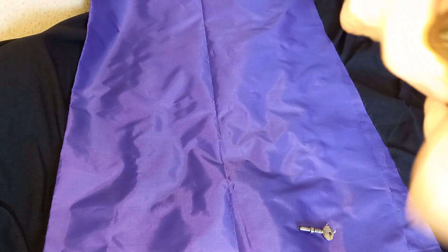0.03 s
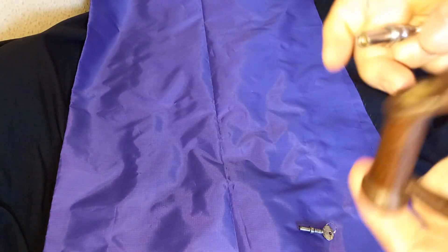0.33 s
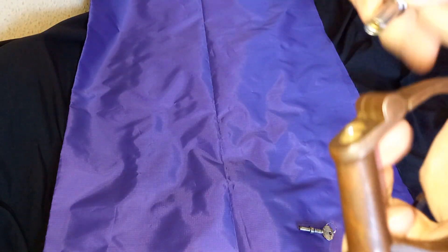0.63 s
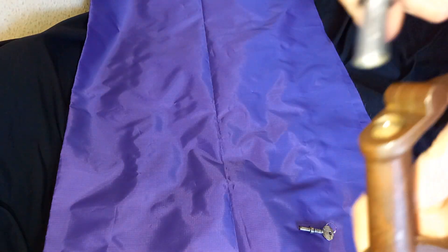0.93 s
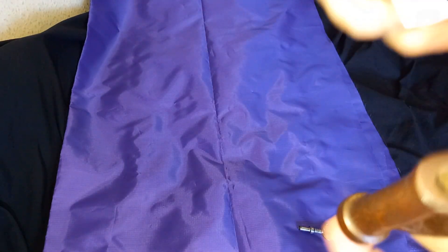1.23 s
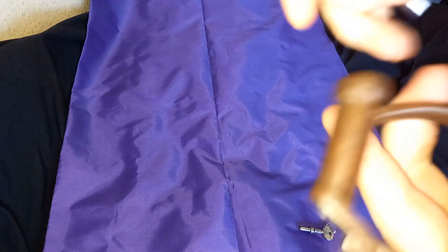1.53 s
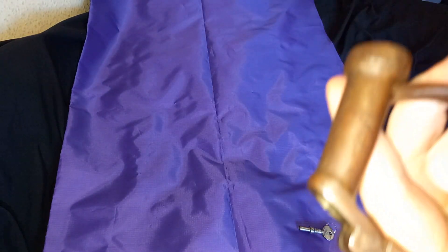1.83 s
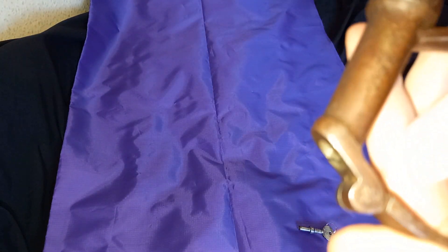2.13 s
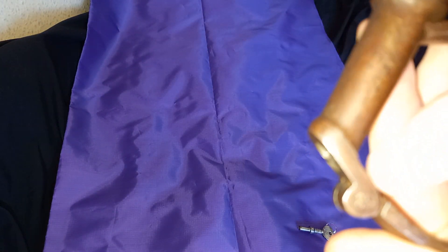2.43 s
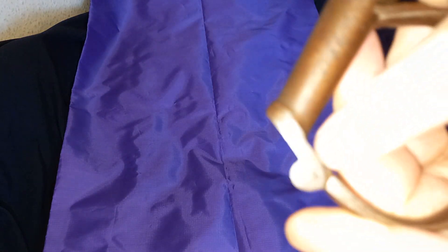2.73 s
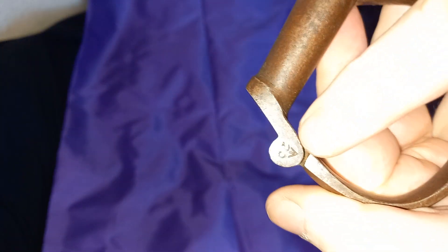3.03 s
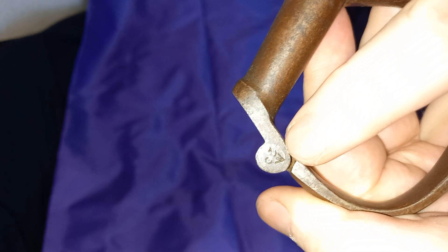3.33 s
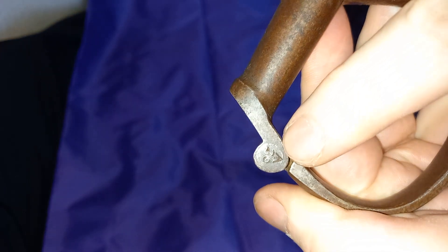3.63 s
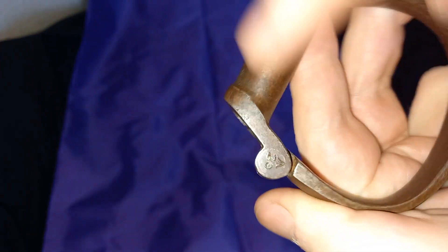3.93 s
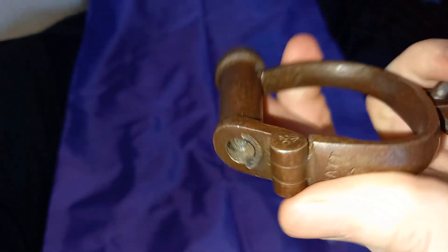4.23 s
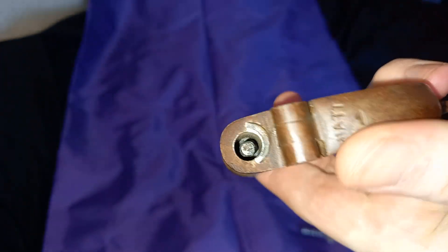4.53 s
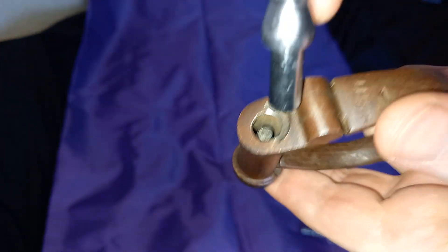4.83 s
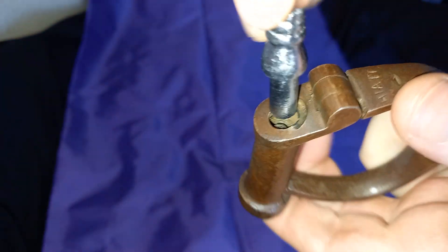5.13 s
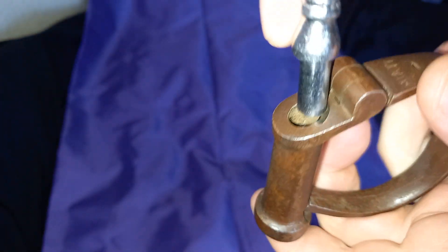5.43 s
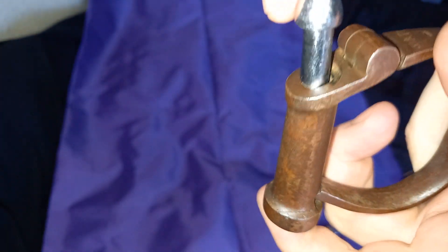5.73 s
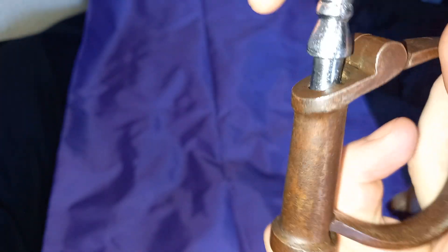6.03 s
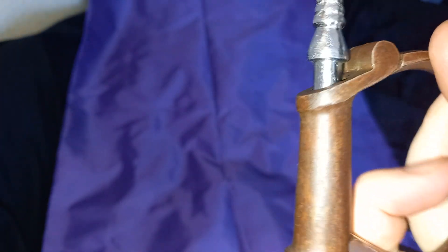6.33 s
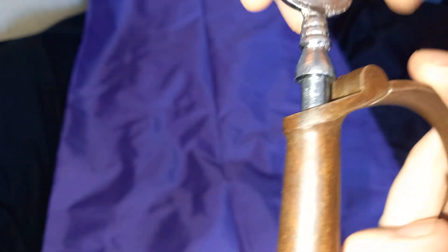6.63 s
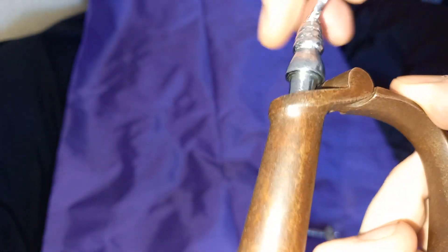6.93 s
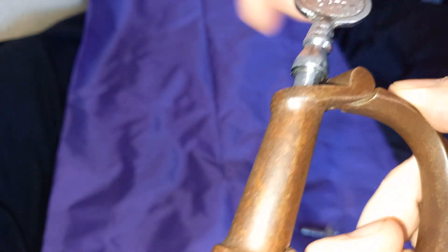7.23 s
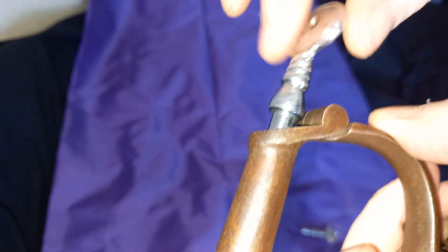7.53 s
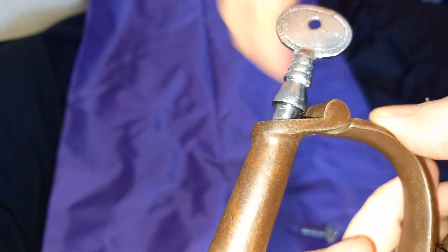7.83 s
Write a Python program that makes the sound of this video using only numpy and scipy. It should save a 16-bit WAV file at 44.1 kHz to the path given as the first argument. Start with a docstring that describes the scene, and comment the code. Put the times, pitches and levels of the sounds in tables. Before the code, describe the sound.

In a small room with a faint hum and hiss, someone handles metal handcuffs right by the microphone. Short, ringing clinks and light scrapes come first, slightly to the right, mixed with dull hand bumps. Things go almost still, then the clinking returns. A little to the left, a key clicks against the keyhole, rattles sharply into the lock and turns with small ticks and thin squeaks.

```python
"""Old steel handcuffs are turned in the hands, close to a stereo microphone in a small, quiet room.
A low hum lies under it all. First hands bump softly, skin slides on metal and the links clink.
Near 2 s the bow (the swinging arm) knocks on its hinge; a fingertip rubs it, and both parts sound again.
From 5 s a barrel key taps the keyhole, drops into the lock near 6 s and is screwed in with faint squeaks.
Each knock is a sharp crack and a few ringing tones; each slide or squeak is a stream of tiny catches."""
import sys
import numpy as np
from scipy import signal
from scipy.fft import rfft, irfft, next_fast_len
from scipy.io import wavfile

SR = 44100
rng = np.random.default_rng(int(sys.argv[2]) if len(sys.argv) > 2 else 0)


def transcribe(signal):
    """Save signal, clipped to [-1, 1], as a 16-bit WAV file at the path in sys.argv[1]."""
    frames = np.atleast_2d(signal).T
    limited = np.clip(frames, -1, 1)
    pcm = np.round(limited * 32767).astype(np.int16)
    wavfile.write(sys.argv[1], SR, pcm)


N = 357210
TIME = np.arange(N) / SR

# Still air and microphone hiss. Each row: pitch in Hz, relative level in dB.
AIR_COLOUR = [(40, -27.5), (65, -5), (140, -5.5), (225, -5), (450, -10.5), (900, -19.5), (1470, -19),
              (4000, -33.5), (6000, -33.5), (8000, -42.5), (10700, -44), (14000, -48), (14900, -22.5),
              (15800, -28)]
# The low background murmur, which dips early and slowly swells again.
# Each row: time in seconds, level in dB.
MURMUR_LEVELS = [(0.0, -60.5), (0.4, -71), (4.4, -65), (8.1, -66)]
# The low hum. Each row: pitch in Hz, level in dB.
HUM_TONES = [(173, -72), (227, -75)]
# Hands and sleeves. Each row: middle in seconds, rough length in seconds, pitch in Hz, relative level in dB.
HAND_BUMPS = [(.1, 0.96, 58.8, -55.5), (.58, 0.25, 62, -57), (1.079, 0.34, 70, -55),
              (1.55, 0.31, 121, -54.5), (1.76, 0.17, 129, -58.5), (2.44, 0.15, 131, -56),
              (3.38, 0.18, 270, -62), (4.27, 0.087, 135, -54), (4.721, 0.12, 134, -56.5),
              (6.109, 0.13, 115, -58), (6.47, 0.084, 79.6, -55), (7.471, 0.31, 106, -58.5),
              (7.86, 0.24, 129, -58)]
# The dying tail of a click at the start, then fingers and steel sliding.
# Each row: time of the peak in seconds, rough length in seconds, relative level in dB, treble in dB.
SLIDE_STROKES = [(0.004, 0.028, -39.5, -3.5), (0.081, 0.18, -56.5, -16), (0.204, 0.17, -55, -14.5),
                 (0.477, 0.18, -61, -9), (0.642, 0.084, -54, -2.5), (1.324, 0.044, -49, -5),
                 (1.422, 0.045, -47.5, 5), (1.507, .03, -49, 0), (1.538, 0.019, -43, -1),
                 (1.559, .015, -45.5, -4), (1.571, 0.023, -44, -7), (1.66, 0.24, -59, -1.5),
                 (4.15, 0.03, -51, -5), (4.299, 0.047, -47.5, -2), (4.426, 0.023, -50, 9.5)]
# The tones that sliding wakes in the steel. Each row: pitch in Hz, relative level in dB.
SLIDE_TONES = [(1280, -7.5), (1900, -10), (2760, -3), (3300, -6), (4400, -5.5), (5100, -6)]
# The cuffs move from right to left. Each row: time in seconds, left level minus right level in dB.
CUFF_PATH = [(0.2, -6.5), (4.55, -5), (5.05, 5.5), (5.8, 2), (6.1, 1), (6.8, 6.5)]
# Light touches of steel on steel. Each row: start in seconds, peak level in dB, pitch in Hz.
LIGHT_TOUCHES = [(0.1096, -28.5, 2860), (0.145, -30, 2740), (0.416, -26.5, 5030), (0.5147, -43.5, 5000),
                 (0.6492, -37.5, 5600), (1.2088, -42, 5240), (1.269, -28, 4950), (1.4605, -40, 4500),
                 (1.8794, -34, 2200), (6.403, -39.5, 6600), (6.4358, -29, 3000), (6.752, -38.5, 6250),
                 (7.4915, -38.5, 5950)]

# The knocks of links, bow, key, lock and screw thread. Each row: start in seconds, relative level in dB,
# extra lows in dB, extra treble in dB, how much ringing the grip leaves in dB.
LINK_KNOCKS = [(0.1849, -34, 14, -9, -3), (0.1865, -19.5, -7.5, 11, -2.5), (0.2408, -19.5, 1, 19, -0.5),
               (1.3349, -41.5, 14, -7, -5), (1.4989, -27.5, 0, 8, -6), (4.1607, -42, -11.5, -10, -10.5),
               (4.2181, -37, 8, -16, -5), (4.2723, -30.5, -5, 15, -3), (4.3015, -29.5, -2, 17.5, -4)]
BOW_KNOCKS = [(1.7155, -31, -15, -15, 2), (1.7355, -25, -19, -6, 1), (1.7402, -24, 5, 8, -0.5),
              (1.9256, -50.5, 13, -15, -12), (4.5471, -41.5, 1, -22, -25), (4.5596, -43.5, 4.5, -20, -24.5)]
KEY_KNOCKS = [(5.0244, -29.5, 5.5, 4, 0.5), (5.0366, -41, 0, 2, 8), (5.0494, -20.5, 3, 10, -2),
              (5.0514, -25, 4.5, 4.5, -3), (5.1067, -39, 19, 1, 16), (5.388, -59.5, 8.5, 0, 18),
              (5.6168, -40.5, 14, 2, -14), (5.7947, -30.5, 2.5, -1, -11), (5.8039, -33.5, 4.5, 10.5, -1.5),
              (5.9713, -19, 0, 19, -4)]
LOCK_KNOCKS = [(5.9863, -16, 0.5, -1, -2), (6.0764, -35.5, -11, -11.5, -2), (6.0838, -37, -0.5, -9, 4.5),
               (6.1001, -28.5, -3.5, -2, 4), (6.1072, -25.5, -5, 5, -1), (6.1098, -16.5, -14, 6.5, 3),
               (6.1164, -15.5, -5.5, 7.5, 0), (6.1471, -35, 3.5, 5, -3), (6.1522, -15, -6.5, -0.5, -1),
               (6.1621, -28, 2.5, 10, 2), (6.1692, -33.5, 9, -8, -2)]
THREAD_KNOCKS = [(6.4611, -34.5, -4, 19.5, -2), (6.4668, -30, -9, 14.5, -0.5), (6.4702, -35, 9, 8, 0),
                 (6.8856, -46.5, 1, 4, 0), (7.4924, -46, -4, -20, -5), (7.7306, -55, 3, -7, -5)]
# The colour of each knock, with the microphone's thin ring near 15 kHz.
# Each row: pitch in Hz, relative level in dB.
LINK_COLOUR = [(700, -23), (1600, -22.5), (2350, -3.5), (2900, 0), (3700, -6), (4900, 4.5), (6000, -3),
               (7200, -7), (8500, -20), (13000, -28.5), (15300, -22.5)]
BOW_COLOUR = [(700, -18.5), (1100, -13), (1700, -13), (2400, -5), (3000, -2), (3800, -10), (4800, -5),
              (6200, -11.5), (8500, -21), (13000, -32), (15300, -23)]
KEY_COLOUR = [(700, -38.5), (1100, -13), (1600, -7.5), (2300, -5), (2950, 2), (3600, -15), (4800, 0.5),
              (5700, -7.5), (6800, -5.5), (8200, -29.5), (9800, -14), (12800, -41), (15500, -15.5)]
LOCK_COLOUR = [(700, -33.5), (1250, -13.5), (1800, -10.5), (2300, -6), (3700, -3), (4700, 2), (5900, 3),
               (6700, -8), (7400, -5), (8400, -14), (13000, -14), (15000, -4.5)]
THREAD_COLOUR = [(700, -33), (2200, -8.5), (2950, 6), (3800, 1), (5200, -1.5), (6700, 0), (8500, -41),
                 (13000, -33), (15300, -26.5)]
# The tones of each knock; those near 15 kHz are the microphone's thin ring.
# Each row: pitch in Hz, relative level in dB, seconds to fade by 60 dB.
LINK_TONES = [(1216, -20.5, .05), (2700, -27.5, 0.3), (2740, -4.5, .018), (4530, -23, .1), (5144, -3, 0.01),
              (5150, -29, .19), (6700, -25.5, .07), (10500, -28, 0.068)]
BOW_TONES = [(2303, -6, 0.07), (2340, -30, 0.35), (2440, -26.5, .35), (4230, -22, .11), (6700, -14, 0.041)]
KEY_TONES = [(1080, -12, 0.05), (1740, -18, 0.09), (2550, -23, 0.045), (2850, -27, 0.04), (2900, 1, 0.012),
             (5025, -27, .04), (7000, -15, 0.027), (9650, -2.5, 0.032), (11140, -25, 0.055),
             (15400, -18, 0.035)]
LOCK_TONES = [(1170, -23.5, 0.029), (2200, -26, 0.13), (3680, -47, 0.4), (3420, -47, 0.3),
              (4570, -23.5, .07), (5150, -24.5, 0.05), (5600, -18.5, 0.045), (5960, -10, 0.035),
              (7430, -19, 0.085), (11180, -22, 0.06), (14600, -17.5, .05)]
THREAD_TONES = [(3100, -22, 0.048), (6040, -8, 0.039), (6540, 7, 0.033), (11150, -25, 0.093)]

# A fingertip rubbing the bow, then the key squeaking in the lock.
# Each row: middle in seconds, rough length in seconds, pitch in Hz, width of the band in Hz, level in dB.
FINGER_RUBS = [(2.59, 0.071, 2700, 1800, -70.5), (2.83, .27, 3700, 2000, -71)]
KEY_SQUEAKS = [(5.374, 0.093, 1285, 400, -63), (5.377, 0.077, 2600, 930, -66),
               (6.874, 0.04, 4600, 920, -56), (6.879, 0.062, 1400, 200, -62.5),
               (6.998, 0.31, 7400, 500, -79), (7.164, 0.1, 4430, 600, -70), (7.652, .11, 1487, 140, -57.5),
               (7.637, 0.064, 4700, 1400, -62), (7.768, 0.14, 2900, 1400, -63),
               (7.879, 0.16, 1506, 140, -64.5)]
# The room's echo. Each row: pitch in Hz, seconds to fade by 60 dB.
ROOM_FADE = [(500, 0.17), (1320, 0.21), (3500, 0.17), (9000, 0.077), (15000, 0.087)]


def undb(db):
    """Turn decibels into a number to multiply by."""
    return 10 ** (np.asarray(db) / 20)


def unit(x):
    """Scale a sound to an average (rms) level of 1."""
    return x / np.sqrt(np.mean(x ** 2))


def colour(x, points):
    """Filter a sound along (Hz, dB) points, falling steeply below the first."""
    size = 2 * next_fast_len(x.shape[-1] // 2 + 1024)
    f = np.maximum(np.arange(size // 2 + 1) * SR / size, 1)
    hz, db = np.transpose(points)
    gain = undb(np.interp(np.log(f), np.log(hz), db)) * np.clip(f / hz[0], .1, 1) ** 2
    # fold the filter so that nothing sounds before its cause
    cepstrum = irfft(np.log(gain))
    cepstrum[1:size // 2] *= 2
    cepstrum[size // 2 + 1:] = 0
    return irfft(rfft(x, size) * np.exp(rfft(cepstrum)), size)[..., :x.shape[-1]]


def noise(points):
    """Separate left and right noise, coloured along (Hz, dB) points."""
    return unit(colour(rng.standard_normal((2, N)), points))


def wander(rate):
    """Drift to a new random value `rate` times a second."""
    knots = rng.standard_normal(int(N / SR * rate) + 2)
    return np.interp(TIME * rate, np.arange(len(knots)), knots)


def resonate(x, hz, width_hz):
    """Let a sound ring the steel around one pitch."""
    return signal.lfilter(*signal.iirpeak(hz, hz / width_hz, fs=SR), x)


def add(out, s, sound):
    """Mix a sound in, starting at s seconds."""
    start = int(s * SR)
    sound = sound[:, max(-start, 0):max(N - start, 0)]
    out[:, max(start, 0):max(start, 0) + sound.shape[1]] += sound


def pan(x, pan_db):
    """Make the left side pan_db louder than the right."""
    return x * undb(np.array([[.5], [-.5]]) * pan_db)


def from_cuffs(sound, s, lag_s_per_db=3.3e-5):
    """Put a sound where the cuffs are at s seconds: the far side gets it quieter and a moment later."""
    pan_db = np.interp(s, *np.transpose(CUFF_PATH))
    lag = int(round(abs(pan_db) * lag_s_per_db * SR))
    left = np.roll(sound[0], lag * (pan_db < 0))
    right = np.roll(sound[1], lag * (pan_db > 0))
    return pan(np.array([left, right]), pan_db)


def swell(length, hz, width_hz, grain_db, shared):
    """A band of uneven catches swells and dies mid-way through one second; `shared` makes the sides alike."""
    t = np.arange(SR) / SR - .5
    window = np.cos(np.pi / 2 * np.clip(t / (.75 * length), -1, 1)) ** 2
    grip = np.interp(t, np.linspace(-.5, .5, 250), rng.standard_normal(250))
    catches = rng.standard_normal((3, SR)) * undb(grain_db * grip)
    centre = np.hypot(hz, width_hz / 2)
    band = signal.butter(2, [centre - width_hz / 2, centre + width_hz / 2], "band", fs=SR, output="sos")
    return unit(signal.sosfilt(band, catches[:2] + shared * catches[2])) * window


def background(air_db=-63, waver_db=1.5):
    """Steady air and hiss, a murmur that dips and swells, and a slightly wavering hum."""
    murmur = noise([(120, -16), (260, -3), (600, -2.5), (1400, -13), (4500, -19), (8000, -39),
                    (14000, -47.5)])
    murmur *= undb(np.interp(TIME, *np.transpose(MURMUR_LEVELS)) + waver_db * wander(7))
    hum = 0
    for hz, db in HUM_TONES:
        height = np.sqrt(2) * undb(db + 2.2 * wander(3.5))
        hum += height * np.sin(2 * np.pi * hz * TIME + 0.14 * wander(3.1))
    return undb(air_db) * noise(AIR_COLOUR) + murmur + hum


def hands(gain_db=1, fidget_db=-72):
    """Dull bumps of flesh and cloth, much alike on both sides, over faint random fidgeting."""
    out = noise([(70, -2), (130, 0.5), (250, -8.5), (600, -32), (2000, -64.5)])
    out *= undb(fidget_db + 4 * wander(4.9))
    for s, length, hz, db in HAND_BUMPS:
        bump = swell(length, hz, width_hz=1.1 * hz, grain_db=4.5, shared=0.95)
        add(out, s - .5, bump * undb(db + gain_db))
    return out


def slides(grain_db=4, jerk_db=3, ring_db=-7, dull_hz=7000, rise=0.46, fall=0.43, gain_db=1):
    """After a click's dying tail, skin and steel slide in jerky, tiny catches that ring the steel."""
    catches = rng.standard_normal((2, N)) * undb(grain_db * wander(900) + jerk_db * wander(110))
    scrape = unit(colour(catches, [
        (800, -12.5), (1200, -8.5), (1900, -5), (2800, -1.5), (3700, -2), (4500, -2), (5200, -2),
        (5900, -2.5), (7000, -5.5), (8500, -18), (11000, -11), (13300, -16.5), (15200, -1.5)]))
    # the tones come and go as the point of contact wanders
    ring = sum(unit(resonate(scrape, hz, width_hz=200) * undb(6 * wander(20))) * undb(db)
               for hz, db in SLIDE_TONES)
    scrape = unit(scrape + undb(ring_db) * ring)
    dull = signal.sosfiltfilt(signal.butter(2, dull_hz, fs=SR, output="sos"), scrape)
    force, bite = 0, 0
    for s, length, db, treble_db in SLIDE_STROKES:
        stroke = undb(db) * np.exp(-np.maximum((s - TIME) / rise, (TIME - s) / fall) / length)
        force += stroke
        bite += stroke * undb(treble_db)  # a steel edge bites in the high treble, skin does not
    sliding = (dull * force + (scrape - dull) * bite) * undb(gain_db)
    return pan(sliding, np.interp(TIME, *np.transpose(CUFF_PATH)))


def tinks(crack_s=0.0007, crack_db=-8, spot_width_hz=1100, barrel_hz=2830, barrel_width_hz=450,
          barrel_db=-12):
    """A light touch: a tiny crack briefly rings the spot that is touched, and faintly the barrel."""
    out, t = np.zeros((2, N)), np.arange(SR // 10) / SR
    for s, db, hz in LIGHT_TOUCHES:
        chatter = rng.standard_normal((3, len(t))) * np.exp(-t / crack_s)
        crack = colour(chatter[:2] + 1.5 * chatter[2],
                       [(hz / 2, -6), (hz, 0), (hz * 1.4, -7), (hz * 2.2, -32)])
        spot = resonate(resonate(crack, hz, spot_width_hz), hz, spot_width_hz)
        barrel = resonate(resonate(crack, barrel_hz, barrel_width_hz), barrel_hz, barrel_width_hz)
        tink = unit(spot) + undb(barrel_db) * unit(barrel) + undb(crack_db) * unit(crack)
        tink /= np.abs(tink).max(axis=1, keepdims=True)
        add(out, s, from_cuffs(tink, s) * undb(db))
    return out


def knocks(hits, crack_colour, tones, crack_s, ring_db, gain_db, shared=0.73):
    """Steel hits steel: a crack of many tones that the hand stops at once, then the few that ring on."""
    out, t = np.zeros((2, N)), np.arange(SR // 3) / SR
    hz, tone_db, fade_s = np.transpose(tones)[:, :, None]
    attack = SR // 250  # the first 4 ms set a knock's level
    for s, db, low_db, treble_db, loose_db in hits:
        chatter = rng.standard_normal((3, len(t))) * np.exp(-t / crack_s)
        crack = colour(chatter[:2] + shared * chatter[2], crack_colour)
        crack /= np.sqrt(np.mean(crack[:, :attack] ** 2, axis=1, keepdims=True))
        # the spot that is hit makes each tone louder or softer, and the grip shifts its pitch
        chance = rng.standard_normal((len(tones), 2))
        height = undb(tone_db + ring_db + 2.5 * chance[:, :1]) * undb(-60 * t / fade_s)
        pitch = hz * (1 + .005 * chance[:, 1:])
        phase = rng.random((len(tones), 1)) + rng.random((2, len(tones), 1)) / 2
        ring = (height * np.sin(2 * np.pi * (pitch * t + phase))).sum(axis=1)
        tilt = [(600, low_db / 2), (1400, 0.47 * low_db), (2600, low_db), (4800, 0), (7000, 0.00068),
                (11000, treble_db)]
        # a loosely held part rings, a firmly gripped one only clicks
        hit = colour(crack + undb(loose_db) * ring, tilt)
        hit /= np.sqrt(np.mean(hit[:, :attack] ** 2, axis=1, keepdims=True))
        add(out, s, from_cuffs(hit, s) * undb(db + gain_db))
    return out


def friction(strokes, grain_db, shared):
    """Sticking and slipping sounds in one band a stroke: broad for a fingertip, narrow for the key."""
    out = np.zeros((2, N))
    for s, length, hz, width_hz, db in strokes:
        add(out, s - .5, swell(length, hz, width_hz, grain_db, shared) * undb(db))
    return out


def room(x, wet_db, early_db, early_s=.008, gap_s=0.0035):
    """Quick echoes off hands and table, then a short tail whose treble dies first."""
    t = np.arange(SR // 2) / SR
    f = np.arange(len(t) // 2 + 1) * SR / len(t)
    hz, fades = np.transpose(ROOM_FADE)
    spectrum = rfft(rng.standard_normal((2, len(t))))
    tail = sum(irfft(spectrum * np.interp(f, hz, band), len(t)) * undb(-60 * t / fade_s)
               for band, fade_s in zip(np.eye(len(hz)), fades))
    early = rng.standard_normal((2, len(t))) * np.exp(-t / early_s)
    echo = undb(wet_db) * unit(tail * (t > gap_s)) + undb(early_db) * unit(early * (t > gap_s))
    mono = x.sum(axis=0, keepdims=True) / np.sqrt(2)
    return signal.fftconvolve(mono, echo / np.sqrt(len(t)), axes=1)[:, :N]


def scene():
    """All the steel sounds and their echo, with the hands and the background."""
    steel = knocks(LINK_KNOCKS, LINK_COLOUR, LINK_TONES, crack_s=0.0017, ring_db=-4.5, gain_db=-3)
    steel += knocks(BOW_KNOCKS, BOW_COLOUR, BOW_TONES, crack_s=0.0022, ring_db=-1.5, gain_db=-3)
    steel += knocks(KEY_KNOCKS, KEY_COLOUR, KEY_TONES, crack_s=0.002, ring_db=-5, gain_db=3.5)
    steel += knocks(LOCK_KNOCKS, LOCK_COLOUR, LOCK_TONES, crack_s=0.0015, ring_db=2.5, gain_db=0.5)
    steel += knocks(THREAD_KNOCKS, THREAD_COLOUR, THREAD_TONES, crack_s=0.0036, ring_db=-7.5, gain_db=1)
    steel += tinks() + slides()
    steel += friction(KEY_SQUEAKS, grain_db=7, shared=0.71)
    steel += friction(FINGER_RUBS, grain_db=2, shared=0.45)
    return steel + room(steel, wet_db=-11.5, early_db=-13.5) + hands() + background()


def record(dry, bottom_hz=48, top_hz=16000):
    """Cut the deep bass and the top of the treble."""
    dry = signal.sosfilt(signal.butter(8, bottom_hz, "high", fs=SR, output="sos"), dry)
    return signal.sosfilt(signal.ellip(10, .2, 70, top_hz, fs=SR, output="sos"), dry)


dry = scene()
out = record(dry)
transcribe(out)
```